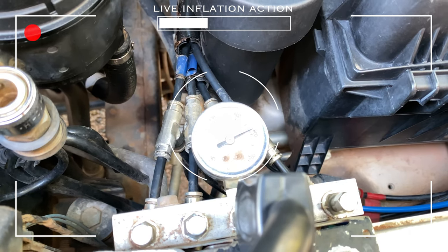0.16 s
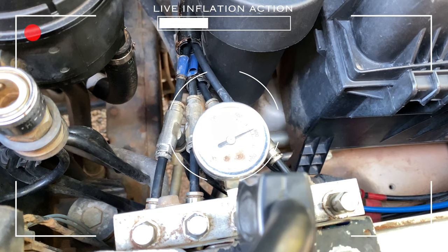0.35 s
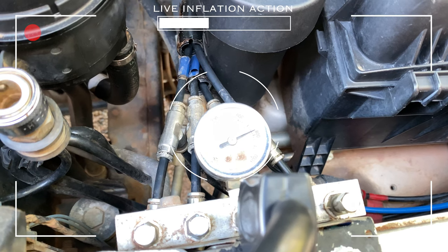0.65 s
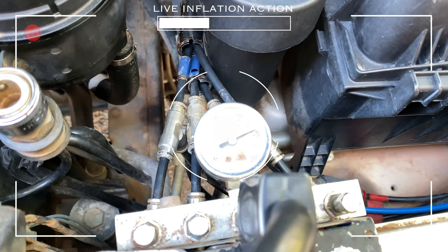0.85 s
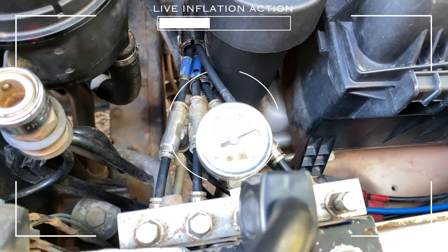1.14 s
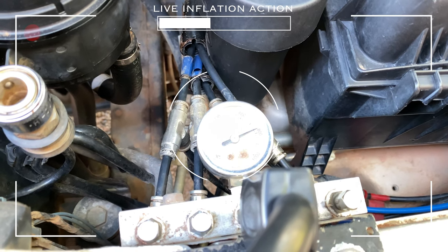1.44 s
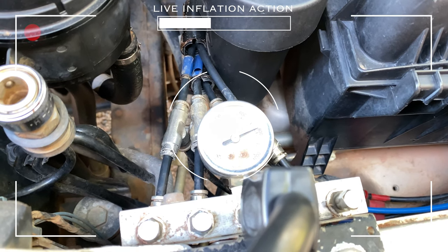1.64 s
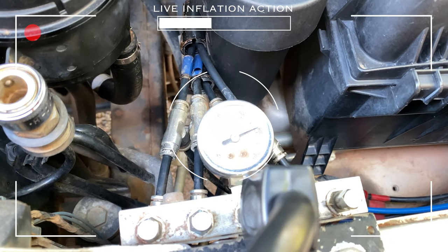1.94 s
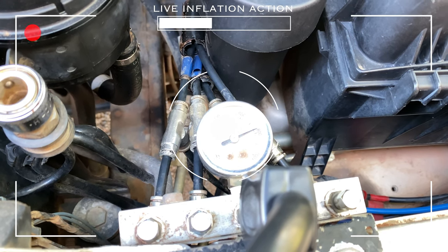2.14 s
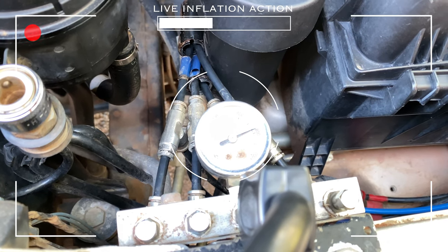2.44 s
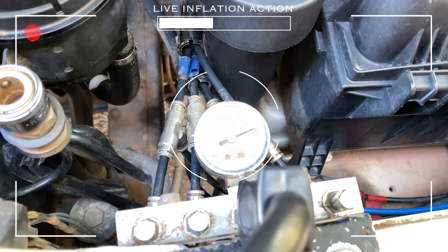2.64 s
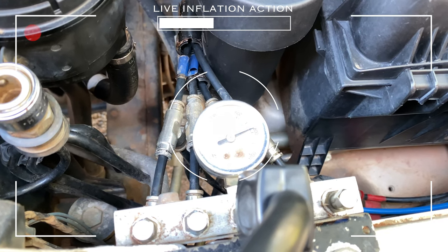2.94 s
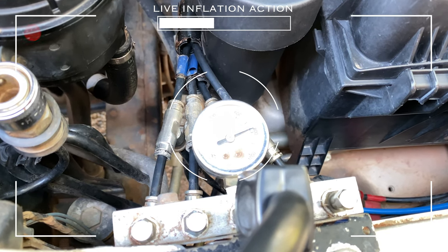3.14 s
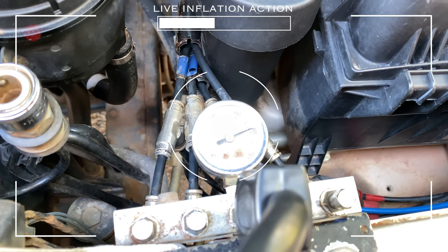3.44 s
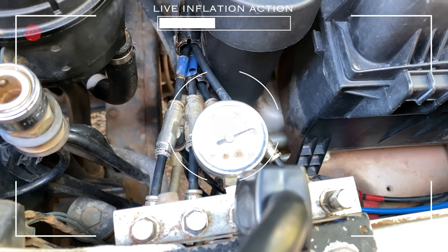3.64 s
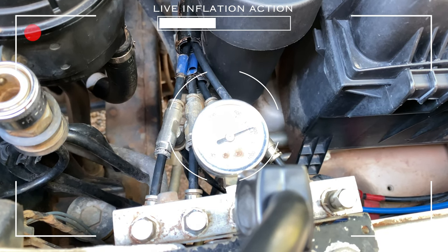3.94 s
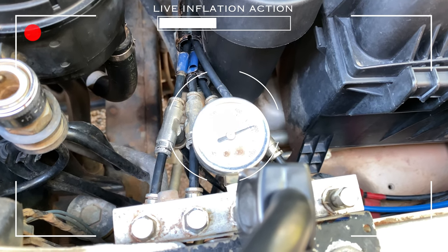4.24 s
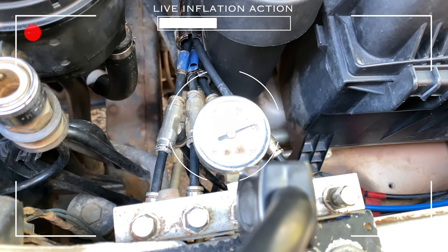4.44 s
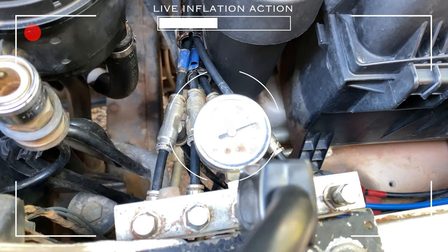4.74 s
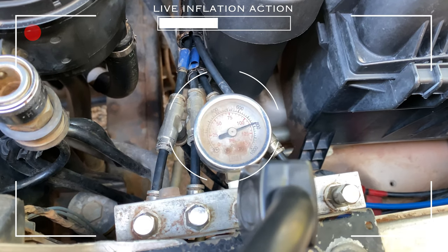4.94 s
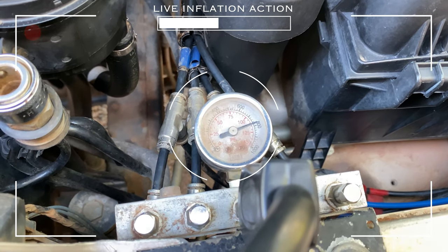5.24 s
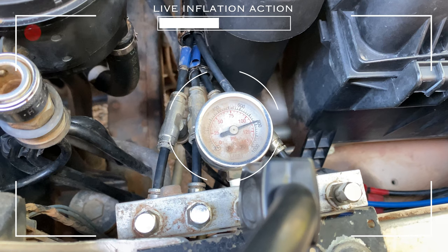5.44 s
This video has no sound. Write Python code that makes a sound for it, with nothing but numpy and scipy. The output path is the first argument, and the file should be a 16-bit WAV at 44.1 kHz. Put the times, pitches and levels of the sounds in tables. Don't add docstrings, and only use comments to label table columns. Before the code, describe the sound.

Close stereo pickup outdoors under an open hood: constant fast compressor knocking, buzzing housing and bright valve snaps sit over a low, loping engine idle. Air buffets the microphone irregularly. Faint bird chips come first, then a row of seven short whistles in the second second, one sharp tap shortly after, and a barely audible fluttering trill. The machinery never stops or changes much.

```python
import sys
import numpy as np
from scipy import signal
from scipy.fft import rfft, irfft
from scipy.io import wavfile

SR = 44100
rng = np.random.default_rng(int(sys.argv[2]) if len(sys.argv) > 2 else 0)


def waveform_to_disk(signal):
    frames = np.transpose(np.atleast_2d(signal))
    scaled = np.clip(frames, -1, 1) * 32767
    samples = np.round(scaled).astype(np.int16)
    wavfile.write(sys.argv[1], SR, samples)


def boost(x):
    u = np.asarray(x, float) / 20
    return 10 ** u


N = 246078
T = np.arange(N) / SR


def evened(x):
    return x / np.sqrt(np.mean(x ** 2) + 1e-20)


def curve(rows):
    return np.interp(T, *np.transpose(rows))


def add(mix, s, sound):
    part = mix[..., round(s * SR):][..., :sound.shape[-1]]
    part += sound[..., :part.shape[-1]]


def drift(per_s):
    knots = rng.standard_normal(int(N / SR * 200) + 2)
    return evened(np.interp(T * min(per_s, 199), np.arange(len(knots)), knots))


def cosine(cycles):
    return np.sqrt(2) * np.cos(2 * np.pi * cycles)


def pair(x, lead_s, pan_db):
    shift = np.exp(1j * np.pi * np.fft.rfftfreq(N, 1 / SR) * lead_s)
    z = rfft(x)
    left = irfft(z * shift, N) * boost(pan_db / 2)
    right = irfft(z / shift, N) * boost(-pan_db / 2)
    return np.array([left, right])


def noise(table, lead_s, gate):
    hz = np.fft.rfftfreq(N, 1 / SR)
    f, *columns = np.transpose(table)
    db, pan_db, like = (np.interp(np.log(hz + 1), np.log(f), c) for c in columns)
    like = np.clip(like, -1, 1)
    a, b = rfft(rng.standard_normal((2, N)) * evened(gate))
    right = (like * a + np.sqrt(1 - like ** 2) * b) * np.exp(-2j * np.pi * hz * lead_s)
    ports = np.array([a * boost(pan_db / 2), right * boost(-pan_db / 2)])
    return irfft(ports * boost(db) * np.sqrt(SR / 2), N)


def bump(turns, angle, sharp):
    return np.exp(sharp * (np.cos(2 * np.pi * (turns - angle)) - 1))


def ring(hz, t60, size):
    t = np.arange(size) / SR
    return boost(-60 * t / t60) * np.sin(2 * np.pi * hz * t)


def engine():
    # time in seconds, engine cycles per second.
    idle = [(0.0, 7.013), (0.25, 6.958), (0.7, 6.764), (1.25, 6.91), (1.65, 6.976), (1.95, 6.919),
            (2.28, 7.228), (2.6, 6.833), (2.95, 6.623), (3.5, 6.678), (3.95, 6.814), (4.15, 6.784),
            (4.5, 6.893), (5.58, 6.891)]
    # time in seconds, level in dB.
    boom_level = [(0, -23), (.12, -26), (.4, -19.3), (.8, -17.5), (1.08, -21.5), (1.33, -19), (1.9, -23),
                  (2.05, -21), (2.32, -25), (2.65, -18), (3.3, -16.5), (3.6, -17), (4.7, -19), (5.3, -19.5),
                  (5.58, -19)]
    # multiple of the cycle rate, level in dB.
    idle_orders = [(8, -36), (9, -38), (10, -42), (11, -33.5), (12, -40), (13, -33.5), (15, -37),
                   (17, -33.5), (19, -33), (20, -44), (22, -41.5)]
    # pitch in Hz, level in dB per Hz, left over right in dB, likeness -1 to 1.
    rumble = [(15, -82, 1, .8), (30.4, -57.5, 0, 0.83), (56, -46.5, -2, 0.73), (100, -42, 0.5, 0.35),
              (138, -51.5, -12, 1), (178, -53.5, -2, 0.98), (250, -55, 1, 0.85), (371, -57.5, 7, 1),
              (500, -86.5, -1, 0.51)]
    bank_lag, pipe_lag = .048, -.27
    cycles = np.cumsum(curve(idle)) / SR + .2993
    boom = boost(curve(boom_level) + .3 * drift(15)) * cosine(16 * cycles + pipe_lag)
    rest = 0
    for k, db in idle_orders:
        odd = k % 2
        banks = np.sign(np.sin(np.pi * k / 8) * np.sin(np.pi * k / 4)) if odd else 1
        lag = bank_lag if odd else pipe_lag
        rest = rest + banks * boost(db + 0.5 * drift(3.2)) * cosine(k * cycles + lag)
    lumps = boost(1.46 * drift(26))
    low = boost(-1.0) * noise(rumble, 0.000462, lumps)
    return pair(boom, 0.000086, -0.22) + pair(rest, 0.00014, -0.61) + low


def knock_strength():
    # time in seconds, dB above the usual knock.
    hard_blows = [(0.13, 4), (0.146, 3), (0.211, 5), (0.293, 5), (0.816, 3), (0.849, 3), (0.996, 3),
                  (1.013, 3), (1.045, 3), (1.095, 5), (1.111, 4), (1.144, 3), (1.34, 4), (1.519, 4),
                  (1.536, 3), (1.683, 4), (1.764, 5), (1.797, 4), (2.074, 3), (2.139, 3), (2.156, 3),
                  (2.4, 3), (2.45, 4), (2.499, 5), (2.515, 5), (2.613, 3), (2.695, 4), (2.776, 4),
                  (2.793, 5), (2.924, 3), (2.957, 3), (2.989, 4), (3.071, 4), (3.137, 5), (3.186, 4),
                  (3.317, 3), (3.334, 4), (3.35, 3), (3.383, 4), (3.677, 4), (3.71, 4), (3.743, 5),
                  (3.759, 4), (3.776, 6), (3.792, 5), (3.825, 3), (3.842, 6), (3.874, 7), (3.891, 6),
                  (3.907, 5), (3.973, 3), (4.17, 4), (4.251, 4), (4.268, 4), (4.431, 3), (4.742, 4),
                  (4.775, 3), (4.791, 3), (5.249, 3), (5.38, 3)]
    # time in seconds, dB relative to the usual knock.
    soft_blows = [(0.015, -5), (0.064, -6), (0.195, -9), (0.408, -8), (0.424, -8), (0.539, -7), (0.555, -9),
                  (0.604, -6), (0.735, -9), (0.914, -9), (0.947, -9), (0.98, -9), (1.029, -7), (1.16, -9),
                  (1.176, -6), (1.242, -8), (1.291, -8), (1.389, -6), (1.422, -6), (1.454, -9), (1.503, -9),
                  (1.585, -7), (1.634, -7), (1.666, -5), (1.715, -5), (1.878, -9), (1.927, -9), (2.058, -6),
                  (2.107, -7), (2.205, -6), (2.237, -7), (2.253, -6), (2.302, -8), (2.368, -5), (2.433, -5),
                  (2.564, -7), (2.63, -9), (3.055, -9), (3.203, -6), (3.268, -9), (3.563, -7), (3.628, -6),
                  (3.661, -7), (3.94, -7), (4.022, -8), (4.071, -6), (4.137, -7), (4.235, -9), (4.35, -5),
                  (4.366, -7), (4.546, -9), (4.628, -7), (4.66, -9), (4.709, -9), (4.971, -7), (5.069, -8),
                  (5.086, -5), (5.216, -7), (5.462, -7), (5.495, -9)]
    blow_s = .007
    knock_db = np.zeros(N)
    for s, db in hard_blows + soft_blows:
        add(knock_db, s - blow_s, db * signal.windows.tukey(round(2 * blow_s * SR), .5))
    return knock_db


def ringing_parts(turns, knock_db, chance):
    # multiple of the crank rate, left level in dB, right level in dB,
    # left lead in ms.
    housing_tones = [(6, -31, -34, 0.31), (7, -41, -53, 0.01), (8, -36, -37, 0.47), (9, -40, -39, 0.77),
                     (10, -44, -45, 0.61), (11, -35, -41, 0.56), (12, -36, -39, 0.3), (13, -29, -29, 0.5),
                     (14, -35, -37, 0.51), (15, -34, -42, 0.39), (16, -44, -48, 0.33), (17, -48, -47, 0.47),
                     (18, -40, -51, 0.47), (19, -43, -47, 0.58), (20, -48, -49, 0.31), (21, -48, -49, 0.16),
                     (22, -50, -51, 0.59), (23, -55, -53, 0.41), (24, -56, -49, 0.4), (25, -49, -61, 0.2),
                     (26, -49, -48, 0.49), (27, -58, -53, 0.35), (28, -53, -55, 0.44), (29, -62, -58, 0.34),
                     (30, -55, -55, 0.42), (31, -59, -59, 0.5), (32, -54, -60, 0.46), (33, -69, -66, 0.3),
                     (34, -62, -70, 0.41), (35, -59, -57, 0.5)]
    # first multiple, last multiple, crank angle of the blow in turns,
    # ring lag in cycles, scatter in turns, unevenness in dB, share of the knock strength, level in dB.
    parts = [
        (6, 9, .38, .33, .002, 1., 0, 0),
        (10, 10, .4, 0, .002, 1.5, 0, -2),
        (11, 12, .837, 0, .001, .5, .9, -5),
        (13, 14, .828, 0, .001, .5, .7, -2.5),
        (15, 15, .842, 0, .001, .5, .3, -1),
        (16, 24, .64, .2, .006, 1.2, 0, 1.5),
        (25, 27, .27, .58, .004, 2., 0, 1.5),
        (28, 28, .27, .08, .004, 2., 0, 1.5),
        (29, 35, .92, .2, .006, 1.2, 0, 1.5),
    ]
    out = np.zeros((2, N))
    for first, last, angle, lag, scatter, uneven_db, share, part_db in parts:
        blow_db = uneven_db * chance[np.floor(turns - angle + 1.5).astype(int)]
        swing = boost(blow_db + share * knock_db) - 1
        gain = boost(part_db) * (1 + swing * bump(turns, angle, 1.3))
        for k, left_db, right_db, lead_ms in housing_tones[first - 6:last - 5]:
            port_delay = np.array([[0], [lead_ms * .06113]])
            late = angle + scatter * rng.standard_normal() + port_delay
            out += boost(np.c_[[left_db, right_db]]) * cosine(k * (turns - late) + lag) * gain
    return out


def loose_parts(turns):
    # pitch in Hz, level in dB per Hz, left over right in dB, likeness -1 to 1.
    rattle = [(248, -82, 2, 0.38), (380, -57, 0.61, 0.96), (603, -66, 0.53, 0.45), (723, -54.5, 5.2, 0.99),
              (1030, -64.5, 1.4, 0.77), (1500, -66, 0.88, 0.56), (1570, -63.5, 0.86, 0.58),
              (1760, -67, 1, 0.81), (2240, -74, 1.1, 0.13), (3050, -117.5, 1.4, 0.21)]
    z = np.zeros(257, complex)
    level_db = -64.5 + 4 * rng.standard_normal(74) - .08 * np.arange(74)
    z[36:110] = boost(level_db) * np.exp(2j * np.pi * rng.random(74))
    one_turn = irfft(z) * 256 * np.sqrt(2)
    place = (turns + .002 * drift(20)) % 1 * 512
    buzz = np.interp(place, np.arange(512), one_turn, period=512)
    shake = (1 + .5 * bump(turns, 0.563, 24.0)) * boost(0.69 * drift(30))
    return pair(buzz, 0.000448, 3.5) + noise(rattle, 0.00042, shake)


def head_thud(turns, knock_db, chance):
    turn = np.floor(turns + .65).astype(int)
    loose = rng.standard_normal((400, 2))
    cycles = (12.4 + .25 * loose[turn, 0]) * ((turns + .65) % 1 - .482)
    looseness = .7 * np.clip(1 - knock_db / 4, .15, 1.5)
    start = looseness * (.8 * loose[turn, 1] + .6 * loose[turn - 1, 1])
    level = boost(-28 + 1.15 * knock_db + .8 * chance[turn])
    thud = bump(turns, .865, 3.2) * level * 2 * np.cos(2 * np.pi * cycles + start)
    return pair(np.roll(thud, 10), .00045, 3)


def housing(turns):
    knock_db = knock_strength()
    chance = rng.standard_normal(400)
    rock = boost(-40) * cosine(2 * (turns - .04))
    struck = ringing_parts(turns, knock_db, chance) + head_thud(turns, knock_db, chance)
    return rock + struck + loose_parts(turns)


def valves(turns):
    # crank angle in turns, level in dB, unevenness in dB.
    reeds = [
        (.62, 0, 1.2),
        (.81, -4.5, 2),
        (.095, -5.5, 2),
    ]
    # pitch in Hz, level in dB, time to die by 60 dB in seconds.
    plate = [(7180, -14, 0.0038), (8600, -11, 0.0027), (8800, 16, 0.0039), (10700, 11.5, 0.0093),
             (10370, 17.5, 0.0043), (12700, -38, 0.0029), (13600, -22, .002), (15600, -17, .003)]
    # pitch in Hz, level in dB per Hz, left over right in dB, likeness -1 to 1.
    hiss = [(1460, -88.5, -29, 0.074), (2250, -77, 2.5, 0.056), (2980, -76.5, 1.5, 0.091),
            (3580, -76.5, 6.5, 0.4), (4100, -80, 3, 0.11), (4880, -76.5, 6, 0.21), (5200, -78, 2, 0.041),
            (6000, -75.5, 5, 0.039), (6900, -81.5, -4, 0.28), (7490, -79, 6.5, 0.68), (9900, -110, 9, .3),
            (16000, -140, 0, .3)]
    # pitch in Hz, level in dB per Hz, left over
    # right in dB, likeness -1 to 1.
    jet_noise = [(5000, -105, 0, -.9), (7400, -86, 0, -.9), (8300, -81, 0, -.95), (9700, -86, 0, -.93),
                 (10500, -82, 0, -.95), (11300, -87, 0, -.92), (12000, -89, 0, -.92), (12700, -86, 0, -.92),
                 (13200, -89.5, 0, -.92), (14300, -88.5, 0, -.9), (15600, -88, 0, -.92),
                 (16200, -92, 0, -.9)]
    lead_s = -.000253
    out = np.zeros(N)
    for hz, mode_db, t60 in plate:
        clicks = np.zeros(N)
        for angle, db, uneven_db in reeds:
            at = np.flatnonzero(np.diff(np.floor(turns - angle)))
            spread = rng.standard_normal((400, 2))[:len(at)]
            jitter = (3 * spread[:, 1]).astype(int)
            clicks[np.clip(at + jitter, 0, N - 1)] += boost(db + uneven_db * spread[:, 0])
        out += boost(mode_db) * signal.oaconvolve(clicks, ring(hz, t60, size=600))[:N]
    snaps = pair(boost(-48) * evened(out), lead_s, 0) * [[1], [-1]]
    stir = (1 + .5 * bump(turns, .67, 40.)) * boost(.3 * drift(12))
    jet = 1 + .35 * bump(turns, .32, 5.) + 1.5 * bump(turns, .62, 40.) + .5 * bump(turns, .82, 40.)
    return snaps + noise(hiss, 0.000438, stir) + noise(jet_noise, lead_s, jet)


def buffets():
    # time in seconds, peak level in dB, pitch in Hz, left over right in dB.
    puffs = [(0.103, -18, 278, 8), (0.25, -19.5, 173, 5), (.731, -22, 262, 8), (0.894, -23, 146, 7),
             (1.023, -24.5, 145, 22), (1.383, -23, 211, -2), (1.556, -23, 270, 5), (1.635, -25, 164, 9),
             (1.881, -24, 199, 14), (2.107, -21, 221, 6), (2.146, -19, 200, 3), (2.501, -18, 164, 4),
             (2.787, -16, 151, 10), (3.146, -21.5, 228, 7), (3.593, -27, 181, 11), (3.724, -36, 150, -11),
             (3.821, -19.5, 310, 6), (4.018, -18.5, 235, 7), (4.212, -20, 213, 7), (4.579, -22, 159, 5),
             (5.159, -31, 157, 23), (5.484, -23, 155, 9)]
    out = np.zeros((2, N))
    for s, db, hz, pan_db in puffs:
        cycles = 4 if hz > 275 else 2.5
        t = np.arange(round(cycles * SR / hz)) / SR
        push = np.hanning(len(t)) * np.cos(2 * np.pi * hz * (t - t.mean()))
        add(out, s, boost(db + 4.5 + pan_db * np.array([[.5], [-.5]])) * push)
    return out


def whistle(db, hz):
    wave = np.sin(2 * np.pi * np.cumsum(hz) / SR)
    return boost(db) * np.sqrt(2) * wave * signal.windows.tukey(len(hz), .3)


def bird_chips(out):
    # start in seconds, level in dB, first pitch in Hz, last pitch in Hz, length in seconds.
    chips = [
        (.316, -30, 6100, 5850, .011),
        (.32, -39, 5300, 5100, .014),
        (.338, -43, 5200, 5100, .018),
        (.765, -33, 5650, 5800, .017),
        (.781, -35, 5400, 5200, .014),
        (.796, -36, 6500, 6000, .012),
        (.808, -40, 6000, 5800, .012),
        (.817, -41, 4000, 3800, .02),
    ]
    for s, db, from_hz, to_hz, length in chips:
        add(out, s, whistle(db, np.linspace(from_hz, to_hz, round(length * SR))))


def bird_calls(out):
    # start in seconds, length in seconds, level in dB, settled pitch in Hz, break after seconds.
    calls = [
        (1.143, 0.074, -37.5, 2890, .043),
        (1.268, 0.068, -37.5, 2894, 0.064),
        (1.401, 0.071, -36.5, 2905, 0.04),
        (1.542, .066, -39, 2830, 0.027),
        (1.686, 0.062, -40.5, 2850, 0.026),
        (1.81, .09, -41, 2825, .066),
        (1.944, 0.066, -41, 2790, .044),
    ]
    top_hz, top_s = 2945, .024
    for s, length, db, hz, catch_s in calls:
        t = np.arange(0, length, 1 / SR)
        level_db = db + 3.5 - 3 * t / length - 7 * np.maximum(1 - t / .018, 0)
        level_db = level_db - 11 * np.exp(-((t - catch_s) / .004) ** 2)
        top = (top_hz - hz) * boost(min(db + 41, 0) * 2) * np.exp(-(2 * (t - top_s) / top_s) ** 2)
        scoop = 500 * np.exp(-t / .008)
        add(out, s, whistle(level_db, hz + top - scoop))


def bird_trill(out):
    # start in seconds, length in seconds, level in dB.
    phrases = [
        (2.79, .1, -49),
        (2.97, .22, -48),
        (3.26, .25, -49),
        (3.52, .22, -50.5),
    ]
    # pitch in Hz, pitch wander in Hz, level in dB.
    trill_lines = [
        (6070, 30, -1),
        (6360, 40, -4),
        (6600, 20, 0),
    ]
    for hz, width, line_db in trill_lines:
        flutter_db = 4 * drift(110) - 2.5 + line_db
        pitch = hz + width * drift(30)
        for s, length, db in phrases:
            start = round(s * SR)
            span = slice(start, start + round(length * SR))
            add(out, s, whistle(db + flutter_db[span], pitch[span]))


def birds():
    out = np.zeros(N)
    bird_chips(out)
    bird_calls(out)
    bird_trill(out)
    echoes = sum(g * np.roll(out, round(s * SR)) for s, g in [(.021, .22), (.047, .2), (.075, .12)])
    return pair(out * boost(1.2 * drift(140)) + echoes, 0.000424, 3.2)


def taps():
    # time in seconds, peak level in dB, pitch in Hz, time to die by 60 dB in seconds,
    # left over right in dB.
    hits = [
        (1.94, -40, 12000, .02, 2),
        (2.342, -14.5, 4900, .016, 3.5),
        (2.342, -30, 14500, .012, 2),
        (2.343, -21, 2200, .04, 3),
        (2.35, -27, 5000, .09, 3.5),
        (4.84, -41, 13000, .02, 2),
    ]
    t = np.arange(3000) / SR
    out = np.zeros((2, N))
    for s, db, hz, t60, pan_db in hits:
        raw = rng.standard_normal((2, 3000))
        rung = evened(signal.lfilter(*signal.iirpeak(hz, 2.5, SR), raw))
        crack = evened(.6 * raw + rung)
        decay_db = 60 * np.maximum(t - .0015, 0) / t60
        add(out, s, boost(db - 11.5 + pan_db * np.array([[.5], [-.5]]) - decay_db) * crack)
    return out


def scene():
    # time in seconds, crank turns per second.
    crank = [(0.0, 61.207), (0.28, 60.961), (0.58, 61.354), (0.98, 61.025), (1.55, 61.329), (1.83, 61.261),
             (2.21, 61.359), (2.49, 61.046), (2.71, 61.306), (3.0, 60.868), (3.22, 61.084), (3.64, 61.116),
             (3.75, 60.809), (4.46, 61.247), (4.57, 61.037), (5.0, 61.202), (5.33, 61.008), (5.58, 61.246)]
    turns = np.cumsum(curve(crank)) / SR - .0638
    return engine() + housing(turns) + valves(turns) + buffets() + birds() + taps()


def low_pass(x):
    return signal.sosfilt(signal.butter(12, 15700, fs=SR, output="sos"), x)


def record(dry):
    return low_pass(dry)


dry = scene()
out = record(dry)
waveform_to_disk(out)
```